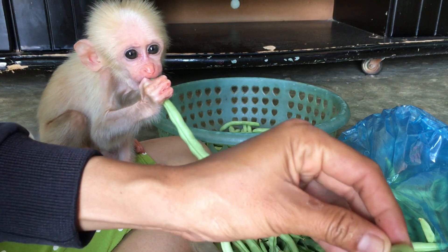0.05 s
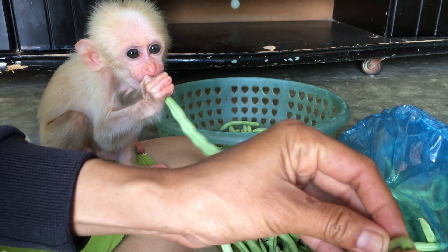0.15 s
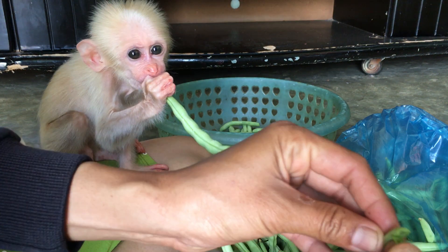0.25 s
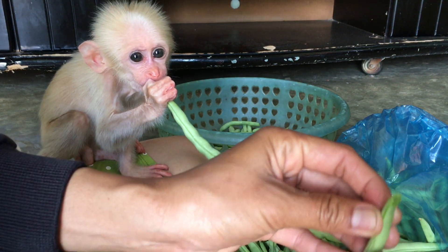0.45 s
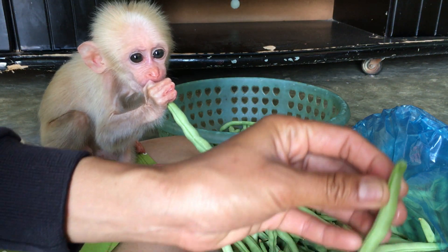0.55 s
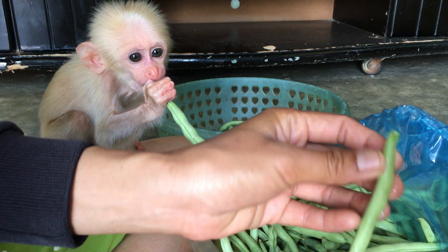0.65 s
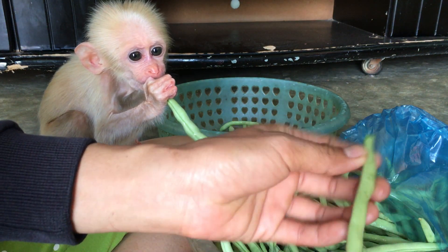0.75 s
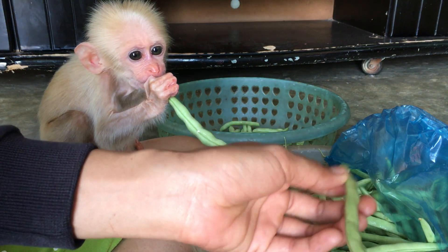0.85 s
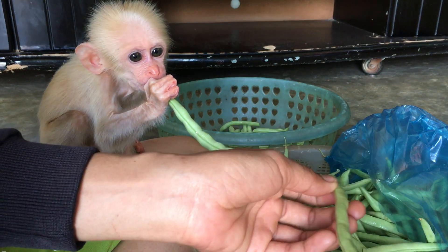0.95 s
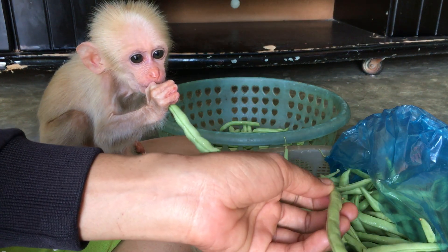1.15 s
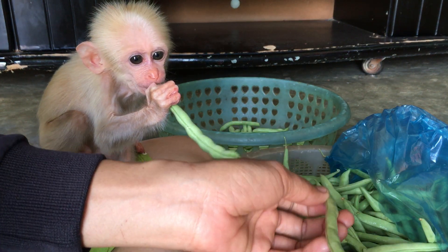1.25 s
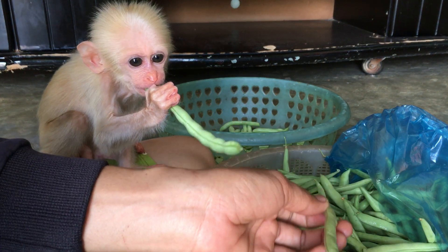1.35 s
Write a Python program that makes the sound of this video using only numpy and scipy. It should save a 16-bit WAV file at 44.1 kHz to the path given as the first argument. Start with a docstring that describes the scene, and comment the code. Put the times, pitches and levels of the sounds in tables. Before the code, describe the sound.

One sharp, crisp crack of a green bean breaking indoors, then faint handling.

```python
"""A low rumble, then one sharp crack: a fresh green bean snapped close by in a hard-walled room.
The pod breaks in a single pulse, two last fibres give way just after, and the room rings briefly.
Fingers then turn the pod with faint ticks, crinkles, slides and dull bumps.
Hiss, a midrange wash and faint far-off tones lie underneath with the rumble."""
import sys
import numpy as np
from scipy import signal
from scipy.fft import rfft, irfft
from scipy.io import wavfile

SR = 44100
rng = np.random.default_rng(int(sys.argv[2]) if len(sys.argv) > 2 else 0)


def master_out(mix):
    """Clip the mix to full scale and print it as 16-bit PCM to the path in sys.argv[1]."""
    frames = np.transpose(np.atleast_2d(mix))
    ceiling = np.clip(frames, -1, 1)
    pcm = np.round(ceiling * 32767).astype(np.int16)
    wavfile.write(sys.argv[1], SR, pcm)


N = 61739
TIME_S = np.arange(N) / SR

# rumble and hiss spectrum: f/Hz, relative density/dB
AIR_SPECTRUM = [(25, -10.5), (32, -14.5), (53, -2), (70, -7), (125, -1.5), (190, -11), (240, -10.5),
                (400, -16), (520, -23), (1070, -24.5), (2280, -29), (3500, -31), (5000, -36.5), (9500, -41),
                (11000, -42), (16000, -44)]
# midrange wash envelope: t/s, level/dB
WASH_ENVELOPE = [(0, -80), (.18, -77.5), (.7, -89.5), (.95, -81.5), (1.2, -77.5), (1.4, -75)]
# low drones and far-off tones: middle t/s, half length/s, f/Hz, width/Hz, level/dB
DRONES = [(0.52, 0.64, 44, 5.4, -67.5), (0.33, 0.38, 91, 4.3, -60), (0.826, 0.16, 130, 15, -62),
          (1.257, 0.26, 140, 60, -64.5), (0.094, .055, 1080, 30, -73), (0.061, 0.078, 1310, 83, -77),
          (1.338, 0.081, 1714, 130, -75)]
# scatter from hands and nearby things: delay/s, energy/dB, t60/s
NEAR_SCATTER = [(.0005, -14, .015), (.0036, -23, .03), (.0078, -19.5, 0.03)]
# diffuse room tail: f/Hz, level/dB, t60/s
ROOM_TAIL = [(149.5, -11.5, 1), (700, -12, 0.34), (1830, -15, 0.43), (2720, -10.5, .48), (3600, -14.5, .5),
             (5000, -19, 0.65), (7400, -14, 0.44), (9500, -17, .46), (11500, -18.7, 0.44),
             (16000, -20.5, 0.31)]
# bumps of hands and pod: t/s, level/dB, f/Hz, t60/s
HAND_BUMPS = [(0.2185, -37, 110, .045), (0.2668, -42, 370, .03), (0.668, -56, 280, .04),
              (0.962, -55, 235, .09), (1.127, -52, 120, .07), (1.276, -53, 140, .06)]
# skin sliding on the pod: middle t/s, half length/s, level/dB
SLIDES = [(0.464, 0.047, -69), (0.554, 0.064, -73), (0.722, 0.03, -79), (0.886, 0.03, -75.5)]
# slide spectrum: f/Hz, relative level/dB
SLIDE_SPECTRUM = [(1000, -2.5), (4000, 2.5), (8000, -3), (9400, 2), (10500, -7), (13000, -3.5),
                  (16000, -15)]
# crinkles of the pod's skin: t/s, level/dB
SKIN_CRINKLES = [(0.719, -52), (0.856, -55), (0.877, -50), (0.8895, -50), (0.924, -53.5), (0.9685, -54),
                 (1.0565, -52.5), (1.245, -57)]
# finger ticks: t/s, level/dB, f/Hz, width/Hz, grain t60/s, grains re click/dB
FINGER_TICKS = [(0.4557, -30, 7420, 3450, 0.0033, -1), (0.4762, -38, 9125, 3000, 0.0071, 1),
                (0.556, -47.5, 7950, 12000, .04, 6), (0.7752, -31.5, 5400, 3800, 0.0049, -7),
                (0.7755, -30.5, 1760, 800, 0.0053, -5), (0.8898, -35.5, 2777, 2600, 0.02, -0.5),
                (1.0945, -34, 2300, 5500, 0.03, -2.5), (1.0962, -44.5, 12000, 11980, 0.027, 2.5)]
# tick filter: f/Hz, gain/dB
TICK_SPECTRUM = [(200, -7), (800, 9), (1700, 3), (3300, 3.5), (4700, -2.5), (5600, 2), (7500, -5.5),
                 (10000, -2), (15000, 3)]
# last fibres tearing: t/s, level/dB, f/Hz, width/Hz, grain t60/s, grains re click/dB
LAST_FIBRES = [(0.2529, -11.5, 4400, 5000, .004, -13), (0.2531, -18, 12500, 6500, .004, -8),
               (0.2668, -19, 2600, 3400, 0.006, -7), (0.2668, -22.5, 11000, 9000, .004, -7)]
# spectrum of the breaking pod: f/Hz, gain/dB
CRACK_SPECTRUM = [(80, -13.5), (130, -10.5), (300, -11.5), (480, -17.5), (750, -15.5), (1200, -7.5),
                  (1500, -13), (1850, -6), (2350, -5.5), (2680, -13), (3200, -2), (6000, 0), (7500, -5),
                  (9600, -1.5), (11000, -7), (15500, -7)]


def from_db(db):
    """Decibels to gain."""
    return 10 ** (np.asarray(db) / 20)


def unit_rms(x):
    """Scale to rms 1."""
    return x / np.sqrt(np.mean(x ** 2) + 1e-20)


def at_hz(table, hz, column=1):
    """Interpolate a table column over log frequency."""
    table = np.array(table)
    return np.interp(np.log(np.maximum(hz, 1)), np.log(table[:, 0]), table[:, column])


def colour(x, spectrum, size=4096):
    """Minimum-phase filter with the given spectrum."""
    gain = from_db(at_hz(spectrum, np.linspace(0, SR / 2, size // 2 + 1)))
    cepstrum = irfft(np.log(gain))
    cepstrum[1:size // 2] *= 2
    cepstrum[size // 2 + 1:] = 0
    response = irfft(np.exp(rfft(cepstrum)))
    return signal.fftconvolve(x, response)[:N]


def click(at_s):
    """Unit impulse."""
    return signal.unit_impulse(N, round(at_s * SR))


def burst(start_s, t60_s):
    """Decaying noise of energy 1."""
    envelope = (TIME_S >= start_s) * from_db(-60 * np.maximum(TIME_S - start_s, 0) / t60_s)
    return unit_rms(envelope * rng.standard_normal(N)) / np.sqrt(N)


def swell(middle_s, half_s):
    """Gaussian rise and fall."""
    return np.exp(-((TIME_S - middle_s) / half_s) ** 2)


def noise(gain_at):
    """Steady noise of rms 1, shaped by gain_at(hz)."""
    white = rfft(rng.standard_normal(N))
    hz = np.arange(len(white)) * SR / N + 0.00093  # keeps clear of 0 Hz
    return unit_rms(irfft(white * gain_at(hz), N))


def resonant_noise(hz, width_hz):
    """Noise twice through one resonance."""
    return noise(lambda f: 1 / (1 + ((f * f - hz * hz) / (f * width_hz)) ** 2))


def crackle(at_s, db, hz, width_hz, t60_s, grains_db):
    """A click and a short crumble of grains, twice through one broad resonance."""
    resonance = signal.iirpeak(min(hz, 0.45 * SR), hz / min(width_hz, 0.4 * SR), fs=SR)
    grains = click(at_s) + from_db(grains_db) * burst(at_s, t60_s) + 1e-18
    return from_db(db) * signal.lfilter(*resonance, signal.lfilter(*resonance, grains))


def background(air_db=-62):
    """Steady rumble and hiss, a midrange wash, and drones and tones that come and go."""
    air = from_db(air_db) * noise(lambda hz: from_db(at_hz(AIR_SPECTRUM, hz)))
    wash_db = np.interp(TIME_S, *np.transpose(WASH_ENVELOPE))
    wash = from_db(wash_db) * resonant_noise(hz=1300, width_hz=1300)
    drones = sum(from_db(db) * swell(middle_s, half_s) * resonant_noise(hz, width_hz)
                 for middle_s, half_s, hz, width_hz, db in DRONES)
    return air + wash + drones


def room(x, delay_s=0.003, build_s=0.014):
    """Direct sound, near scatter, and a diffuse tail that dies band by band."""
    response = click(0) + sum(from_db(db) * burst(at_s, t60_s) for at_s, db, t60_s in NEAR_SCATTER)
    white = rfft(rng.standard_normal(N))
    hz = np.arange(len(white)) * SR / N
    age_s = np.maximum(TIME_S - delay_s, 0)
    edges_hz = np.r_[60, np.geomspace(500, 18000, 12)]
    for low_hz, high_hz in zip(edges_hz, edges_hz[1:]):
        centre_hz = np.sqrt(low_hz * high_hz)
        t60_s = at_hz(ROOM_TAIL, centre_hz, column=2)
        envelope = (1 - np.exp(-age_s / build_s)) * from_db(-60 * age_s / t60_s)
        band = irfft(white * (hz >= low_hz) * (hz < high_hz), N)
        response += from_db(at_hz(ROOM_TAIL, centre_hz)) * band * unit_rms(envelope) / np.sqrt(N)
    return signal.fftconvolve(x, response)[:N]


def bumps(contact_s=0.003):
    """Soft contacts of hands and pod, first on recoil from the break: a few dying low cycles each."""
    out = np.zeros(N)
    for at_s, db, hz, t60_s in HAND_BUMPS:
        age_s = np.maximum(TIME_S - at_s, 0)
        attack = 1 - np.exp(-age_s / contact_s)
        out += attack * from_db(db - 60 * age_s / t60_s) * np.sin(2 * np.pi * hz * age_s)
    return out


def slides(slips_per_s=2900, spread_db=3):
    """Skin slides along the pod in dense tiny slips."""
    slips = (rng.random(N) < slips_per_s / SR) * rng.choice([-1, 1], N)
    strength = from_db(spread_db * rng.standard_normal(N))
    pressure = sum(from_db(db) * swell(middle_s, half_s) for middle_s, half_s, db in SLIDES)
    return pressure * unit_rms(colour(slips * strength, SLIDE_SPECTRUM))


def crinkles():
    """The pod's skin gives tiny crisp crackles."""
    return sum(crackle(at_s, db, hz=11000, width_hz=11000, t60_s=0.007, grains_db=0)
               for at_s, db in SKIN_CRINKLES)


def ticks():
    """Fingers tick on the pod as they turn it."""
    return colour(sum(crackle(*tick) for tick in FINGER_TICKS), TICK_SPECTRUM)


def snap(at_s=0.2169, pulse_db=8, dispersion=0.52):
    """The pod breaks in one pulse; the last fibres tear just after."""
    crack = colour(from_db(pulse_db) * click(at_s), CRACK_SPECTRUM)
    fibres = sum(crackle(*fibre) for fibre in LAST_FIBRES)
    # all-pass: the pod carries treble faster than bass
    return signal.lfilter([-dispersion, 1], [1, -dispersion], crack + fibres)


def scene():
    """Bean and hands in the room, over the background; mono."""
    close_sounds = snap() + slides() + crinkles() + ticks() + bumps()
    return (room(close_sounds) + background())[None]


def record(dry):
    """Steep low-pass, 60 dB down from 16.8 kHz."""
    return signal.sosfilt(signal.cheby2(12, 60, 16800, fs=SR, output="sos"), dry)


dry = scene()
out = record(dry)
master_out(out)
```